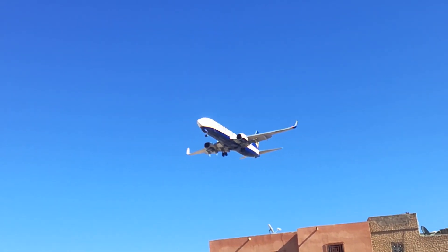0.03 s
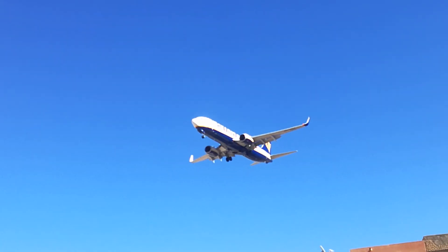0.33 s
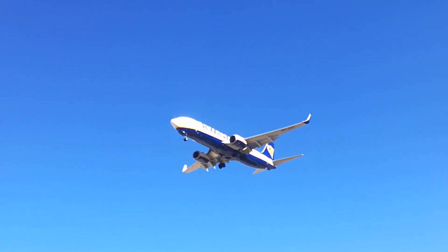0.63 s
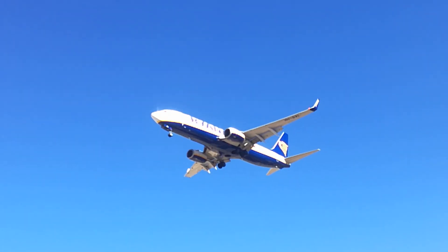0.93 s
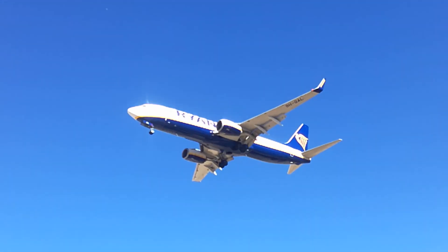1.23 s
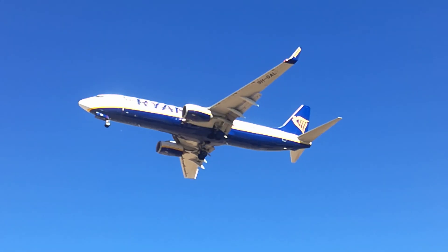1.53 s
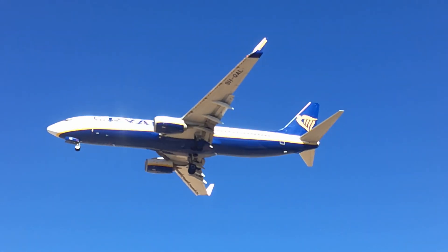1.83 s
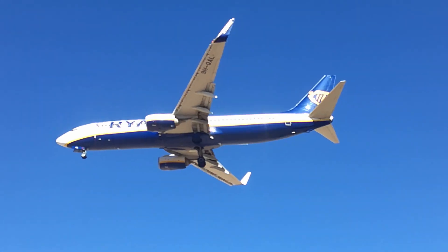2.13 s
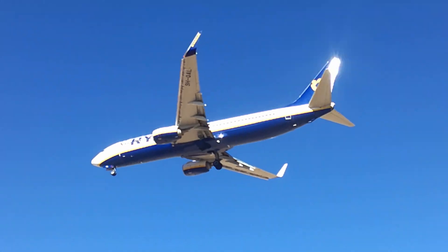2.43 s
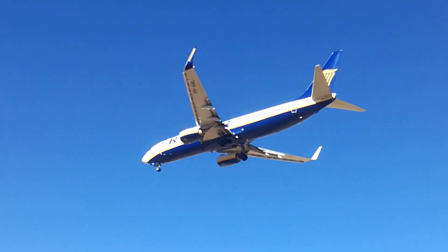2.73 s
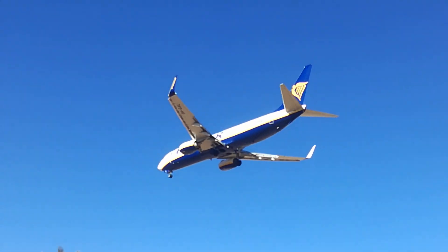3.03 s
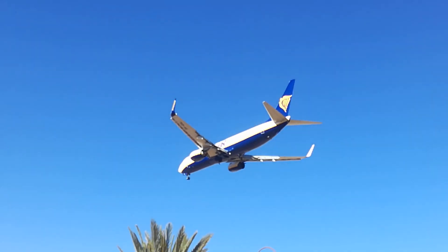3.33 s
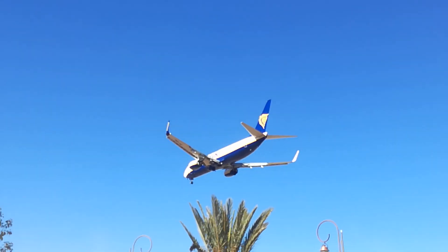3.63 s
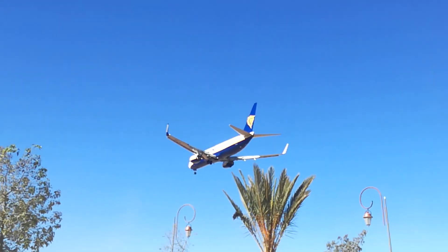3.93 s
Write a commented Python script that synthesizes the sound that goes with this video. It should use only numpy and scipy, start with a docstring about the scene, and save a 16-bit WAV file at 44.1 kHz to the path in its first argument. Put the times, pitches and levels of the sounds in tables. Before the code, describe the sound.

A landing jet plane flies close overhead with a rumbling roar and a sinking whine.

```python
"""A jet's rumble and whine, already close: a twin-engined airliner coming in to land passes low over
a pair of microphones, nearest at about 2.1 s. Jet rumble, flap roar, airframe rush and fan hiss swell
and fade; the fan tones sink by the Doppler effect, and turbine and combustors sound from the rear.
The echo off the ground sweeps a comb through the noise, and the air makes the treble flutter and
dulls it with distance. Close by lie a faint hiss and a few rustles."""
import sys
import numpy as np
from scipy import signal
from scipy.fft import rfft, irfft
from scipy.io import wavfile

SR = 44100
rng = np.random.default_rng(int(sys.argv[2]) if len(sys.argv) > 2 else 0)


def master(y):
    """Save y as 16-bit WAV."""
    cut = np.clip(np.atleast_2d(y).T, -1, 1)
    pcm = np.round(cut * 32767)  # scale
    wavfile.write(sys.argv[1], SR, pcm.astype(np.int16))


N = 176400
T, HZ = np.arange(N) / SR, np.maximum(np.arange(N // 2 + 1) * SR / N, 1)

# tone colour of the aircraft right overhead: f/Hz, level/dB
OVERHEAD_COLOUR = [(22, -64.5), (43, -49.5), (65, -45), (105, -41), (170, -43.5), (235, -42.5),
                   (300, -44.5), (400, -49.5), (520, -50.5), (720, -51.5), (950, -47.5), (1350, -48.5),
                   (2000, -49.5), (2400, -54), (2800, -62), (3500, -56.5), (4500, -62), (5500, -65),
                   (6500, -75), (7500, -83.5), (9000, -84.5), (11000, -98.5), (14000, -100.5),
                   (15500, -111)]
# six parts of its noise heard from the ground, low to high: t/s, level/dB against that colour
DEEP_AIRFRAME = [(0, -8), (1.2, 1.5), (2.1, 3), (2.8, -5), (4, -10)]
JET_RUMBLE = [(0, -5), (0.3, -2), (1.3, -0.5), (2.1, -3), (2.8, -8.5), (3.4, -4), (3.8, -3.5), (4, -4.5)]
ROAR = [(0, -7), (0.3, -5), (0.7, -2.5), (1, -2.3), (1.5, -0.6), (2, 0.9), (2.4, 0), (2.8, -2), (3.2, -5),
        (3.5, -7), (4, -10)]
FLAP_ROAR = [(0, -7), (0.5, -5), (1, -4.5), (1.5, 0.5), (2, 2.3), (2.4, 0.5), (2.8, -1.5), (3.2, -5),
             (3.5, -8), (4, -9.5)]
AIRFRAME_RUSH = [(0, -6), (0.2, -4), (0.599, -4), (1, -4), (1.5, -1.5), (2, 0.5), (2.41, -0.2), (2.48, -3),
                 (2.848, -3.5), (3.25, -6), (3.652, -9.5), (4, -12)]
FAN_HISS = [(0, -10.5), (0.2, -7), (0.6, -6), (0.85, -3.5), (1.5, -1.7), (2.1, 0.3), (2.4, 1.9), (2.5, 0.2),
            (2.85, -2.5), (3.15, -3.5), (3.35, -7), (4, -14)]
# borders between the six parts: f/Hz
CROSSOVERS = [68, 165, 340, 700, 2600]
# flutter from turbulent air between aircraft and microphones: f/Hz, depth/dB
AIR_FLUTTER = [(60, 1.9), (230, -0.04), (1500, 0.43), (5000, 1.3), (10000, 2)]
FLUTTER_PER_S, FLUTTER_SHARED = 17, 0.33
AIR_FROM_HZ, AIR_DB_PER_KHZ = 4050, 3   # treble loss for each overhead distance of extra path
AIR_BEHIND_SHARE = 0.57   # the exhaust side stays brighter


def flyover(source):
    """The aircraft passes over: each third octave swells, flutters, and loses treble with distance."""
    spectrum = rfft(source) * from_db(at_hz(OVERHEAD_COLOUR, HZ))
    parts_db = [in_time(p) for p in (DEEP_AIRFRAME, JET_RUMBLE, ROAR, FLAP_ROAR, AIRFRAME_RUSH, FAN_HISS)]
    lag = in_time(ECHO_LAG)   # shorter the farther off the aircraft is
    extra_path = (lag.max() / lag - 1) * np.interp(from_behind(), [0, 1], [1, AIR_BEHIND_SHARE])
    centres = np.geomspace(30, 15360, 28)
    out, shared = 0, drift(FLUTTER_PER_S)
    for hz, pick in zip(centres, np.eye(len(centres))):
        band = irfft(spectrum * np.interp(np.log(HZ), np.log(centres), pick), N)
        swell_db = parts_db[np.searchsorted(CROSSOVERS, hz)]
        air_db = AIR_DB_PER_KHZ * extra_path * max(hz - AIR_FROM_HZ, 0) / 1000
        flutter_db = at_hz(AIR_FLUTTER, hz) * (FLUTTER_SHARED * shared + drift(FLUTTER_PER_S))
        out = out + band * from_db(swell_db - air_db + flutter_db)
    return out


# fan blade rate at the microphones, falling with the Doppler shift: t/s, f/Hz
BLADE_RATE = [(0, 1662), (.4, 1650), (.95, 1590), (1.3, 1535), (1.6, 1468), (1.85, 1380), (2.17, 1303),
              (2.5, 1215), (2.75, 1170), (3, 1139), (3.3, 1114), (3.6, 1099), (4, 1109)]
# fan tones over 1 Hz of the noise around them: multiple of blade rate, level ahead/dB, level behind/dB
FAN_TONES = [(.982, 12, 3), (1.965, 15, 8), (2.93, 15, 4), (4, 18, 20), (4.99, 20, 23.5), (5.99, 25, 7),
             (7.04, 26, 18), (8.04, 21, 19)]
# second engine against the first: level ahead/dB, level behind/dB
SECOND_ENGINE = [-2, -12]
SECOND_ENGINE_RATIO, PITCH_WANDER, TONE_FLUTTER_DB = .982, .0022, 3.3
SHADOW_DB = 12   # the exhaust bends the tones away from straight behind


def fan_whine():
    """Two fans, slightly apart in speed, each sound a stack of wavering blade tones."""
    behind = from_behind()
    shadow_db = SHADOW_DB * beam(at_s=4.4, span_s=0.34)
    second_db = np.interp(behind, [0, 1], SECOND_ENGINE)
    out = 0
    for ratio, engine_db in ((1, 0), (SECOND_ENGINE_RATIO, second_db)):
        blade_hz = ratio * in_time(BLADE_RATE) * (1 + PITCH_WANDER * drift(29.6))
        phase = 2 * np.pi * np.cumsum(blade_hz) / SR
        for multiple, ahead_db, behind_db in FAN_TONES:
            tone_db = engine_db + ahead_db + (behind_db - ahead_db) * behind - shadow_db
            flutter_db = TONE_FLUTTER_DB * drift(9)
            out = out + np.sqrt(2) * from_db(tone_db + flutter_db) * np.sin(multiple * phase)
    return out


def turbine_whine():
    """A turbine tone, wrapped in hiss where the exhaust scatters it, is beamed to the rear."""
    phase = 5.66 * 2 * np.pi * np.cumsum(in_time(BLADE_RATE)) / SR
    tone = from_db(25) * noise_band(phase, width_hz=35)
    scattered = from_db(39) * noise_band(phase, width_hz=400)
    return beam(at_s=2.71, span_s=0.35) * (tone + scattered)


def combustors():
    """A hollow rush, beamed down and to the rear, sweeps over the microphones just after the pass."""
    centre_hz = 823.4
    rush = noise_band(2 * np.pi * centre_hz * T, width_hz=180)
    return from_db(27.5) * beam(at_s=2.76, span_s=0.4) * rush


# echo from the ground below the microphones, latest with the aircraft highest in the sky: t/s, lag/ms
ECHO_LAG = [(0, 2.35), (.5, 2.87), (1, 3.45), (1.5, 4.5), (1.8, 4.88), (2.15, 5.15), (2.5, 4.78), (3, 3.7),
            (3.5, 2.98), (4, 2.33)]
# strength of that echo: f/Hz, level at a grazing angle/dB, level from overhead/dB
GROUND_REFLECTION = [(100, -4, -4.5), (330, -5, -0.5), (650, -6, -10), (1510, -8.5, -16.5),
                     (4000, -16.5, -20)]
ECHO_BEHIND_DB = -2.7   # weaker once the aircraft has passed


def ground_echo(direct):
    """A copy arrives a few milliseconds late; at steep angles the rough ground scatters its treble."""
    lag_s = in_time(ECHO_LAG) / 1000
    steep = ((lag_s - lag_s.min()) / np.ptp(lag_s)) ** 2
    grazing, overhead = (irfft(rfft(direct) * from_db(at_hz(GROUND_REFLECTION, HZ, k)), N) for k in (1, 2))
    reflected = ((1 - steep) * grazing + steep * overhead) * from_db(ECHO_BEHIND_DB * from_behind())
    return np.array([np.interp(T - lag_s, T, channel) for channel in reflected])


# background hiss where the microphones stand: t/s, level/dB
BACKGROUND = [(0, -60), (1, -57.5), (4, -71)]
# rustles close to the microphones: t/s, level/dB
RUSTLES = [(.087, -59), (.227, -59), (.378, -58)]


def near_hiss():
    """A faint, soft hiss, with a few brief rustles close by."""
    rustles = sum(from_db(db) * beam(at_s, span_s=.014) for at_s, db in RUSTLES)
    hiss = signal.sosfilt(signal.butter(1, 5000, fs=SR, output="sos"), rng.standard_normal((2, N)))
    return (from_db(in_time(BACKGROUND)) + rustles) * hiss


def from_behind():
    """0 while the engines face the microphones, 1 once they point away."""
    turn_at_s, turn_s = 1.62, 0.37
    return (1 + np.tanh((T - turn_at_s) / turn_s)) / 2


def beam(at_s, span_s):
    """A bell-shaped swell, as when a source's beam sweeps over the microphones."""
    return np.exp(-((T - at_s) / span_s) ** 2 / 2)


def noise_band(phase, width_hz):
    """A narrow band of noise around a carrier; rms 1."""
    return drift(width_hz) * np.cos(phase) + drift(width_hz) * np.sin(phase)


def drift(rate_hz):
    """Smooth random motion with spread 1."""
    count = N // 16
    hz = np.arange(count // 2 + 1) * SR / N
    slow = irfft(rfft(rng.standard_normal(count)) / (1 + (hz / rate_hz) ** 2), count)
    return np.interp(np.linspace(0, count - 1, N), np.arange(count), slow / slow.std())


def from_db(db):
    """Decibels to gain."""
    return 10 ** (np.asarray(db) / 20)


def in_time(rows):
    """A curve at every sample."""
    return np.interp(T, *np.transpose(rows))


def at_hz(rows, hz, column=1):
    """One column of a table, read on a log-frequency axis."""
    rows = np.array(rows)
    return np.interp(np.log(hz), np.log(rows[:, 0]), rows[:, column])


def scene():
    """Under the approach path, the aircraft's direct sound meets its ground echo and the nearby hiss."""
    turbulence = rng.standard_normal((2, N)) * np.sqrt(SR / 2)   # unit power per Hz
    engines = np.array([combustors() + turbine_whine() + fan_whine() for _ in range(2)])
    direct = flyover(turbulence + engines)
    return direct + ground_echo(direct) + near_hiss()


# the microphone pair: f/Hz, likeness/0-1, left lead/rad, left minus right level/dB
MIC_PAIR = [(60, 1.0, -0.06, 0.3), (247, 0.99, 0.4, -0.2), (332, 1, 0.9, -0.5), (585, 0.65, 1.13, 4.5),
            (750, 0.7, 0.43, 7.5), (1170, 0.95, 1.11, 1.5), (1360, 0.97, -1.1, -2.2),
            (1490, 0.43, 0.14, -5.5), (1880, 0.75, 1.34, -5.5), (2500, 0.28, 1.43, 2.5),
            (2800, 0.34, 0.2, -3.5), (3230, 0.96, 1.5, -8.5), (3960, 0.69, 2.5, -3), (4400, 0.67, 3.5, 3.5),
            (4470, 0.68, 2.5, 12), (5120, 0.17, 3, 0.5), (6400, 0.33, 4.5, 0.5), (6940, 0.76, 4, -1),
            (8300, 0.3, 5, -1.5), (10000, 0.12, 5.5, 0)]
CUTOFF_HZ = 15700


def record(dry):
    """Two microphones on one small body differ in phase and level by frequency; the top is cut."""
    common, apart = rfft(dry)
    alike, lead, balance_db = (at_hz(MIC_PAIR, HZ, k) for k in (1, 2, 3))
    alike = np.clip(alike, 0, .998)
    sides = np.array([[1], [-1]])   # left, right
    power_share = 1 / (1 + from_db(-sides * balance_db) ** 2)
    blend = np.sqrt(1 + alike) * common + sides * np.sqrt(1 - alike) * apart
    pair = blend * np.sqrt(power_share) * np.exp(1j * sides * lead / 2)
    return signal.sosfilt(signal.cheby2(12, 70, CUTOFF_HZ, fs=SR, output="sos"), irfft(pair, N))


dry = scene()
out = record(dry)
master(out)
```